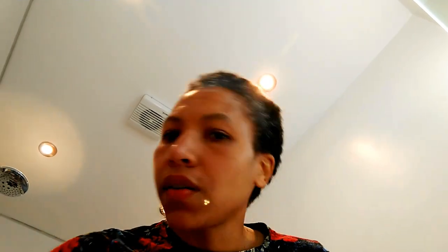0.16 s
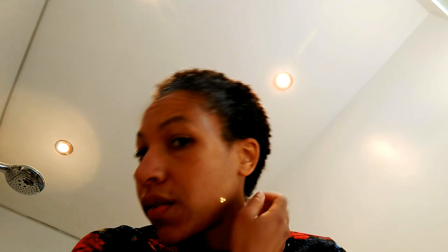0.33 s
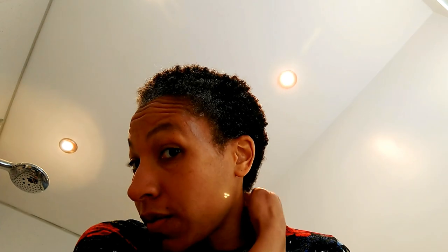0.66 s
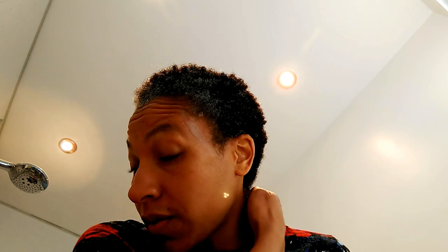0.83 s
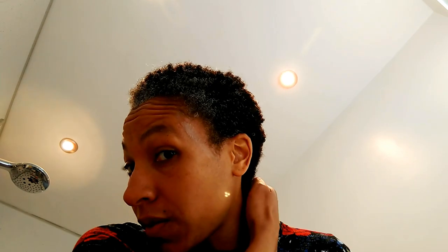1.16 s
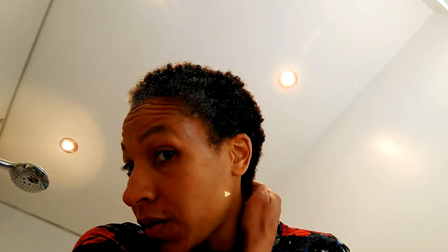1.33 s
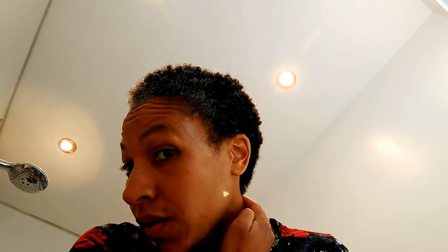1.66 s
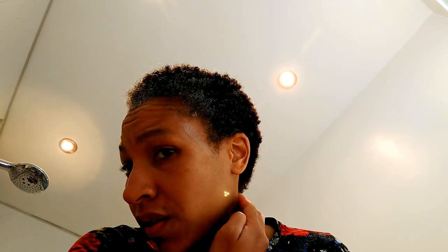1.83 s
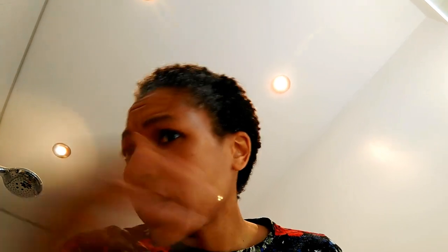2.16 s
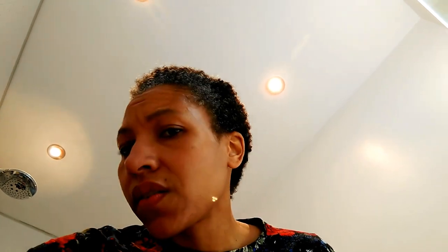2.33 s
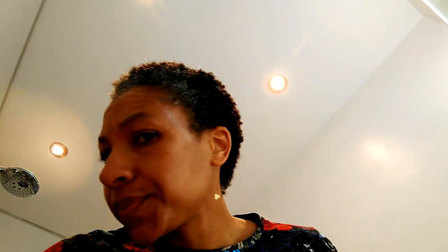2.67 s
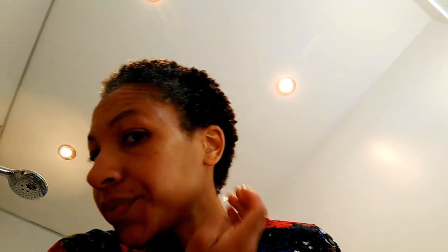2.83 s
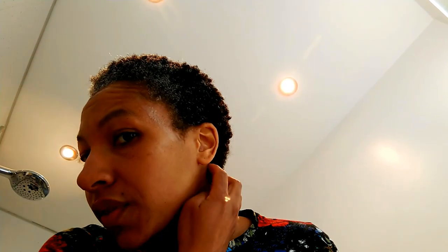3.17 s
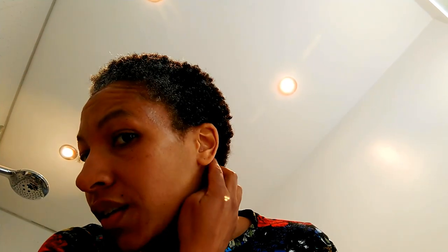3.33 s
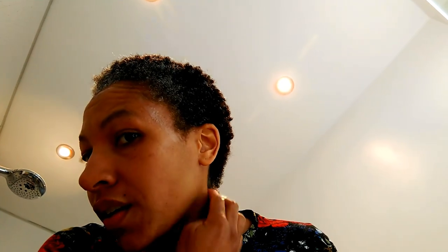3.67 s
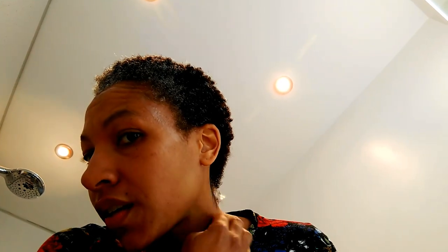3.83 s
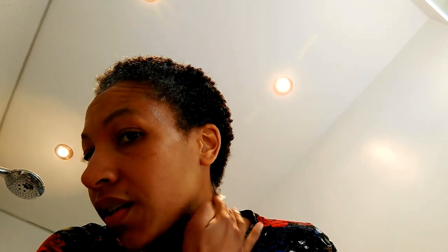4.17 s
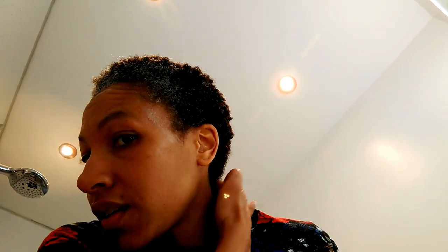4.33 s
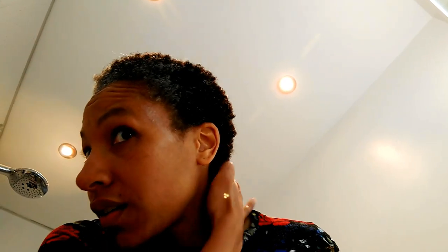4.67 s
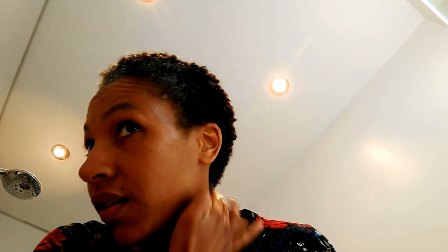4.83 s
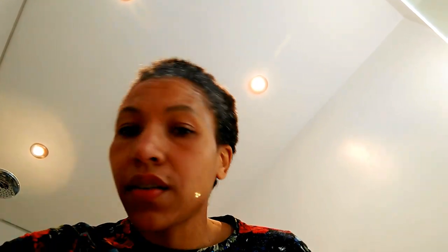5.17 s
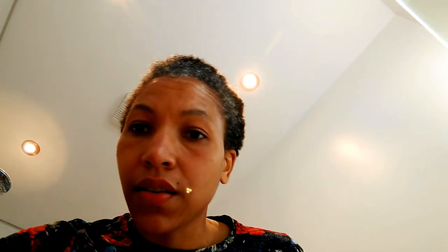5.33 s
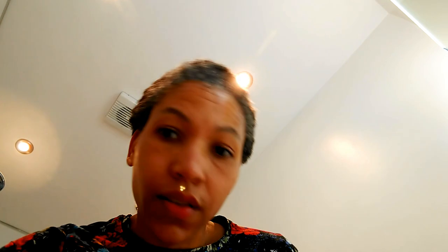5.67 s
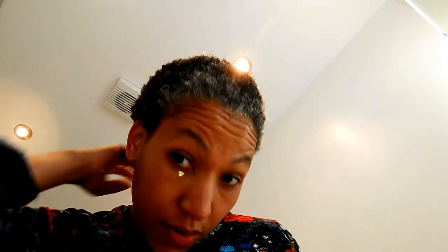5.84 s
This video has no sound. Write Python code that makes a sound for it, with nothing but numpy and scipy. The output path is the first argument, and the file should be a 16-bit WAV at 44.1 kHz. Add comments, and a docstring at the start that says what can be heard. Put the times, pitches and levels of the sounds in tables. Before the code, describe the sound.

A close handheld stereo microphone picks up a wavering, throbbing ventilation fan with soft low airflow. Right away something hard clatters in several fast bounces, far louder than the fan, with a short tiled-room echo. Small dry rubs of fingers on skin and cloth, ticks and faint bumps come next. A single knock lands mid-way, after which the hum's stereo balance shifts; rustles resume before one more sharp knock.

```python
"""An extractor fan hums throughout in a small tiled bathroom: wavering narrow-band tones over coloured air
noise, one tone throbbing with its own noise. A hard knock with bounces opens (filtered click, echoes, noise
tail, modes); then a hand rustles on skin and cloth (uneven noise bands), ticks (noise bursts) and blips
(swelling tones) sound. A second knock comes at 2.6 s; just after, the handset shifts and its two microphone
ports hear the sound differently. Rustle, ticks and blips return, with a last knock at 5.3 s."""
import sys
import numpy as np
from scipy import signal
from scipy.fft import rfft, irfft, next_fast_len
from scipy.io import wavfile
from scipy.ndimage import uniform_filter1d

SR = 44100
rng = np.random.default_rng(int(sys.argv[2]) if len(sys.argv) > 2 else 0)


def digitize_waveform(pressure):
    """Quantize a signal to 16-bit integers and store it at the path in sys.argv[1].

    Rows of a 2-D input are taken as channels; values are limited to [-1, 1].
    """
    field = np.atleast_2d(pressure).T
    bounded = np.clip(field, -1, 1)
    quanta = np.round(bounded * 32767).astype(np.int16)
    wavfile.write(sys.argv[1], SR, quanta)


N = 264820
SIZE = next_fast_len(N + SR)  # FFT length, padded
TIME = np.arange(N) / SR
HZ = np.maximum(np.arange(SIZE // 2 + 1) * SR / SIZE, 1)

# microphone ports: freq_hz, likeness (0-1), left_lead_before_rad, left_lead_after_rad
PORTS = [(60, .3, -2.6, -3.1), (150, .6, -2.6, -3.3), (330, .4, -3.9, -3.4), (450, .95, -1.95, -2.2),
         (600, .9, -1.9, -1.9), (900, .7, -.75, -.8), (1300, .92, -.2, -.1), (1900, .9, .1, .2),
         (2300, .88, 1.45, 1.5), (2800, .92, 2.45, 2.5), (3500, .85, 3.2, 3.3), (5000, .5, 6.1, 6.1),
         (9000, .4, 6, 6), (16000, .7, 6, 6)]


def from_db(db):
    """Gain of a level in dB."""
    return 10 ** (np.asarray(db) / 20)


def rms_one(x):
    """Scale to rms 1."""
    return x / np.sqrt(np.mean(np.abs(x) ** 2) + 1e-20)


def over_hz(points, axis=1):
    """Read one column of a frequency table at every bin, on a log axis."""
    table = np.array(points)
    return np.interp(np.log(HZ), np.log(table[:, 0]), table[:, axis])


def narrow(width_hz, count=N):
    """Complex noise around 0 Hz, rms 1, from a double-pole resonator."""
    pole = np.exp(-np.pi * width_hz / SR / 2)
    run_in = min(SR, count)
    white = rng.standard_normal(count + run_in) + 1j * rng.standard_normal(count + run_in)
    return rms_one(signal.lfilter([1], [1, -2 * pole, pole * pole], white)[run_in:])


def shifted():
    """Handset position: 0 before the move, 1 after."""
    shift_s = (2.75, 3.45)
    return np.interp(TIME, shift_s, [0, 1])


def at_ports(shared, apart, gain, alike):
    """A shared part leads at one port by a phase per frequency; an unrelated part enters with opposite signs."""
    weights = np.sqrt([alike + 0 * HZ, 1 - alike + 0 * HZ])
    shared, apart = rfft([shared, apart], SIZE) * gain * weights
    heard = []
    for column in (2, 3):
        turn = np.exp(.5j * over_hz(PORTS, axis=column))
        ports = [(shared + apart) * turn, (shared - apart) * turn.conj()]
        heard.append(irfft(ports, SIZE)[:, :N])
    before, after = heard
    return before + (after - before) * shifted()


def noise(spectrum, crackle_db=0):
    """Coloured noise at both ports, rms 1; uneven sample sizes make it crackle."""
    alike = (1 + np.clip(over_hz(PORTS), 0, 1)) / 2
    sizes_db = crackle_db * np.minimum(rng.exponential(1, N), 6)
    white = rng.standard_normal((2, N)) * from_db(sizes_db)
    return rms_one(at_ports(*white, from_db(over_hz(spectrum)), alike))


def tone(hz, wobble, lead_rad, pan_db):
    """A carrier with a complex wobble, split between the ports in phase and level."""
    carrier = np.sqrt(2) * wobble * np.exp(2j * np.pi * hz * TIME[:len(wobble)])
    left = carrier * np.exp(.5j * lead_rad) * from_db(pan_db / 2)
    right = carrier * np.exp(-.5j * lead_rad) * from_db(-pan_db / 2)
    return np.real([left, right])


def fan():
    """Air noise, plus blade tones and duct resonances that waver by their width, plus the throbbing tone."""
    # air noise colour: freq_hz, relative_level_db_per_hz
    air_colour = [(15, -44.5), (45, -37), (66, -21), (110, -28), (160, -10.5), (270, -5.5), (385, -3.5),
                  (430, -12.5), (680, -27.5), (1200, -36), (2000, -39), (3100, -34), (3700, -47.5),
                  (5500, -54.5), (9000, -77.5)]
    air_db = -46
    return from_db(air_db) * noise(air_colour) + fan_tones() + throbbing_tone()


def fan_tones():
    """Narrow-band tones whose level, phase and balance glide as the handset moves."""
    # tones: freq_hz, width_hz, then before the shift level_db, left_lead_rad, left_minus_right_db,
    # then the same three after it
    tones = [(154.8, 2.7, -49.5, -1.8, 4.4, -48, 3, -6), (221.4, 8.7, -53, 0.81, 12, -48, 3, -6),
             (311.2, 5.9, -52, 1.6, 0.5, -55, 3, -12.5), (359.4, 16, -63.5, 0.7, 0.54, -57, 1.5, -8.5),
             (760, 12, -76.5, -1.1, 0.96, -78.5, -1.5, 5.5), (935, 5.5, -79, -1.1, 1.5, -82, -3, 17),
             (1416, 71, -77.5, -.22, 1.5, -76, -5.5, 1.5), (1753, 60, -79.5, 0.85, 1.3, -82, -6, 1.5),
             (2271, 150, -73, 2.1, 1.5, -77, 1.5, 4.5)]
    shift_dip_db = -5  # the handset passes through a null of the room for the lowest tone
    out, move = np.zeros((2, N)), shifted()
    for hz, width_hz, db, lead_rad, pan_db, after_db, lead_after_rad, pan_after_db in tones:
        steady = np.clip(4.1 / width_hz, 0, 3)  # narrow lines are cleaner
        wobble = rms_one(steady + narrow(18.0 + width_hz))
        dip_db = shift_dip_db * np.sin(np.pi * move) * (hz < 200)
        level_db = db + (after_db - db) * move + dip_db
        lead_now_rad = lead_rad + (lead_after_rad - lead_rad) * move
        pan_now_db = pan_db + (pan_after_db - pan_db) * move
        out += from_db(level_db) * tone(hz, wobble, lead_now_rad, pan_now_db)
    return out


def throbbing_tone():
    """A tone of wandering phase swells and collapses; noise around it joins the collapses, not the peaks."""
    # throbbing noise colour: freq_hz, relative_level_db_per_hz
    skirt_colour = [(390, -45), (420, -3), (460, 11), (520, 2), (600, -4), (640, -56.5)]
    skirt_db, skirt_top_db = -2, -44  # noise relative to tone; tone level at which the noise stops rising
    slow_slips_rad = 1.94 * narrow(1.38).real
    fast_jitter_rad = 0.47 * narrow(39.85).real
    wander = np.exp(1j * (slow_slips_rad + fast_jitter_rad))
    level_db = throb_db()
    hum = from_db(level_db) * tone(466.4, wander, lead_rad=-2, pan_db=1.5)
    skirt_level_db = np.minimum(level_db, skirt_top_db) + skirt_db
    return hum + from_db(skirt_level_db) * noise(skirt_colour)


def throb_db():
    """Throb level: the tone drops out about every 0.38 s, returns, sags and flutters."""
    # dropouts: middle_s, length_s, depth_db (short ones stay shallower), level_after_db (before sag)
    dropouts = [(0.049, 0.041, 13, -40.5), (0.324, 0.13, 13.5, -37), (0.671, 0.15, 9, -36.5),
                (1.078, 0.19, 6.5, -36), (1.48, 0.13, 43, -37.5), (1.862, 0.073, 47, -38),
                (2.218, 0.097, 43, -38.5), (2.615, 0.05, 15, -38.5), (3.038, 0.15, 8.5, -36.5),
                (3.451, 0.09, 35, -40.5), (3.866, 0.095, 38, -38), (4.297, 0.11, 27.5, -36.5),
                (4.619, 0.13, 34.5, -34.5), (4.9, 0.09, 11.5, -35), (5.246, 0.18, 9, -38),
                (5.584, 0.089, 39, -38.5), (5.921, 0.07, 31, -40.5)]
    start_db, sag_db_per_s = -30, 8.5
    fall_s, return_s = 0.083, .025
    flutter_rms_db, flutter_hz = 3, 90
    middle_s, length_s, depth_db, after_db = np.transpose(dropouts)
    last = np.searchsorted(middle_s, TIME)
    since_s = TIME - np.r_[0, middle_s][last]
    level_db = np.r_[start_db, after_db][last] - sag_db_per_s * since_s
    level_db = uniform_filter1d(level_db, size=1500)
    for middle, length, depth in zip(middle_s, length_s, depth_db):
        falling = (TIME - middle + length / 2) / fall_s
        returning = (middle + length / 2 - TIME) / return_s
        level_db -= depth * np.clip(np.minimum(falling, returning) + .5, 0, 1) ** 2
    return level_db + flutter_rms_db * np.sqrt(2) * narrow(flutter_hz).real


def knocks():
    """Each blow is a click with first echoes and a tiled-room tail, coloured by the object, plus modes."""
    # knocks, the first with bounces: start_s, direct_peak_db, room_db, thump_db, hollow_db, snap_db
    blows = [(0.1005, -0.5, -21, -4, 2.4, -2), (0.1125, -4.5, -17, -0.5, -1.5, 3.5),
             (0.1235, -3.5, -25, 0, 2, -10), (0.136, -11, -23.5, -3.5, -7, 0),
             (0.1465, -5.5, -32, -4.5, 1, 2), (0.1518, -12, -27, -2, 4.5, -3),
             (2.6285, 0, -24.5, 4, 0.5, -1), (5.3012, 0.46, -24.5, 1.5, -10, 6)]
    # object colour: freq_hz, relative_level_db_per_hz
    object_colour = [(24, -49), (97, -36.5), (200, -11.5), (300, -22.5), (560, -12), (780, -6.5),
                     (1040, -18), (1390, -8), (2050, -24), (2400, -15), (3300, -35), (4000, -38.5),
                     (6000, -59.5), (10000, -70.5), (16000, -76.5)]
    part_centres_hz = (220.2, 755.5, 2550)  # thump, hollow, snap
    ring_db = -23.5
    out = np.zeros((2, N))
    alike = (1 + .95 * np.clip(over_hz(PORTS), 0, 1)) / 2
    for start_s, db, room_db, *parts_db in blows:
        def struck_db(hz):
            """How this blow favours the parts of the object."""
            return sum(part_db * np.exp(-(np.log2(hz / centre_hz) / 0.46) ** 2)
                       for part_db, centre_hz in zip(parts_db, part_centres_hz))
        at = round(start_s * SR)
        colour = causal(from_db(over_hz(object_colour) + struck_db(HZ)))
        clicks = click_and_echoes(at)
        direct = at_ports(clicks, clicks, colour, 0.97)
        blow = direct + from_db(room_db) * at_ports(*room_tail(at), colour, alike)
        modes = ringing(at, struck_db)
        rung = at_ports(modes, modes, 1, 0.97)
        out += from_db(db) * (blow / np.abs(direct).max() + from_db(ring_db) * rung)
    return out * from_db([[.3], [-.3]])


def causal(gain):
    """Minimum-phase filter of a magnitude, so that nothing sounds before a hit."""
    cepstrum = irfft(np.log(gain + 1e-9), SIZE)
    cepstrum[1:SIZE // 2] *= 2
    cepstrum[SIZE // 2 + 1:] = 0
    return np.exp(rfft(cepstrum))


def click_and_echoes(at):
    """A unit click and first reflections of random sign, slightly jittered; later ones are duller."""
    # first reflections: delay_s (before jitter), level_db
    echoes = [(.0008, -8.5), (.0016, -0.5), (.0027, -3.5), (.0083, -3), (0.0115, -8.5), (.018, -15)]
    clicks = np.zeros(N)
    clicks[at] = 1
    for (delay_s, echo_db), (jitter, sign) in zip(echoes, rng.uniform(-0.92, 1, (len(echoes), 2))):
        smear = np.hanning(3 + round(.03 * delay_s * SR))
        start = at + round(delay_s * (1 + 0.052 * jitter) * SR)
        clicks[start:start + len(smear)] += from_db(echo_db) * np.sign(sign) * smear / smear.sum()
    return clicks


def room_tail(at):
    """Dense reflections: noise that builds up, then decays at its own rate in each band."""
    # room decay: freq_hz, t60_s
    room_t60 = [(100, 0.53), (500, .19), (1400, .16), (2600, 0.15), (4500, .19), (7000, .09),
                (12000, 0.05015)]
    hz, t60_s = np.transpose(room_t60)
    t = np.arange(SR // 2) / SR
    spectra = rfft(rng.standard_normal((2, len(t))))
    bins_hz = np.fft.rfftfreq(len(t), 1 / SR)
    edges_hz = np.geomspace(20, 20000, 19)
    decaying = np.zeros((2, len(t)))
    for low, high in zip(edges_hz, edges_hz[1:]):
        band = irfft(spectra * ((bins_hz >= low) & (bins_hz < high)), len(t))
        band_t60_s = np.interp(np.log(np.sqrt(low * high)), np.log(hz), t60_s)
        decaying += band * from_db(-60 * t / band_t60_s)
    tail = np.zeros((2, N + SR))
    tail[:, at:at + len(t)] = (1 - np.exp(-t / .006)) * decaying
    return tail[:, :N]


def ringing(at, struck_db):
    """Decaying sine modes of room and object, as strong as the blow favours them."""
    # modes: freq_hz, level_db (before the blow's own weighting), t60_s (before the cap)
    modes = [(228, -24.5, 0.87), (349, -5.5, 0.33), (349.4, 6.5, 0.15), (458.2, -37, 5.0), (753, 14, 0.13),
             (888, -16.5, 0.083), (1045, -0.5, 0.48), (1210, 9.5, 0.074), (1370, -12, 0.067),
             (1758, -16.5, 0.41), (2213, -31, 0.72), (2480, -13.5, 0.9)]
    t60_cap_s = .17
    t = np.arange(SR // 2) / SR
    rung = np.zeros(N + SR)
    for (hz, db, t60_s), phase in zip(modes, rng.uniform(0, 2 * np.pi, len(modes))):
        decay_db = db + struck_db(hz) - 60 * t / min(t60_s, t60_cap_s)
        onset = 1 - np.exp(-t / 0.0024)
        rung[at:at + len(t)] += from_db(decay_db) * np.sin(2 * np.pi * hz * t + phase) * onset
    return rung[:N]


def hand():
    """Crackly rustle in two bright bands over a duller rub; each stroke on skin and cloth rises, holds, fades."""
    # strokes: full_strength_s, hold_s, high_rustle_db, middle_rustle_db, low_rub_db
    strokes = [(0.566, 0.039, -66, -69.5, -47), (1.4, 0.011, -84, -71, -76), (1.453, 0.068, -76, -76, -63),
               (1.596, .02, -76, -97, -85), (1.69, .025, -86, -95, -78), (1.772, 0.049, -69.5, -87, -80),
               (1.87, 0.025, -73, -90, -80), (1.94, .025, -77, -92, -77), (2.062, .025, -81.5, -90, -69),
               (3.592, .006, -73, -86, -62.5), (4.018, .01, -84, -90, -83.5),
               (4.333, 0.041, -59.5, -68.5, -44), (4.415, 0.025, -63.5, -75, -70),
               (4.6, 0.05, -76.5, -85, -86)]
    # high rustle colour: freq_hz, relative_level_db_per_hz
    high_colour = [(9500, -36), (10800, -4), (11500, 0), (12100, 1.5), (13300, -4.5), (15000, 0),
                   (16000, -19)]
    # middle rustle colour: freq_hz, relative_level_db_per_hz
    middle_colour = [(4500, -29), (5800, -29), (7300, -24), (8500, 3), (9200, -2), (9900, -12),
                     (10600, -30)]
    # low rub colour: freq_hz, relative_level_db_per_hz
    rub_colour = [(700, -14), (1000, -12.5), (1500, -10.5), (2000, -17), (2600, 10), (3200, -20),
                  (3500, -16), (3750, -13.5), (4050, -9.5), (4700, -32), (5800, -26.5), (6600, -53)]
    lead_in_db_per_s = 1400
    releases_db_per_s = (260, 260.5, 600)  # high, middle, low: the rub stops soonest
    grain_db, grain_hz = 3.5, 200  # uneven catching of the skin; rms of the complex noise
    levels = np.zeros((3, N))
    for full_s, hold_s, *bands_db in strokes:
        rise_db = lead_in_db_per_s * np.maximum(full_s - TIME, 0)
        fade_db = np.outer(releases_db_per_s, np.maximum(TIME - full_s - hold_s, 0))
        levels += from_db(np.c_[bands_db] - np.minimum(rise_db + fade_db, 200))
    out = np.zeros((2, N))
    for level, colour in zip(levels, (high_colour, middle_colour, rub_colour)):
        grain = rms_one(from_db(grain_db * narrow(grain_hz).real))
        out += level * grain * noise(colour, crackle_db=3)
    return out


def ticks():
    """Small bright ticks: bursts of coloured noise that start at once and die fast."""
    # ticks: start_s, start_level_db, t60_s
    tick_table = [(0.5621, -75, 0.09), (0.5896, -50.5, 0.09), (1.4117, -76, 0.09), (1.4621, -54.5, 0.09),
                  (3.6052, -66, 0.09), (4.3899, -62, 0.09), (4.4258, -77, 0.09), (4.9853, -53.5, 0.14),
                  (5.573, -53, 0.09)]
    # tick colour: freq_hz, relative_level_db_per_hz
    tick_colour = [(4300, -26), (5300, -9), (6200, -23), (7100, -23.5), (8500, -9.5), (9600, -31),
                   (11500, -7.5), (13000, -25), (15300, -19), (16000, -7.5)]
    envelope = np.zeros(N)
    for start_s, db, t60_s in tick_table:
        decay_db = db - 60 * np.maximum(TIME - start_s, 0) / t60_s
        envelope += from_db(decay_db) * (TIME >= start_s)
    return envelope * noise(tick_colour)


def blips():
    """Faint short resonances: narrow-band noise on a carrier under a bell-shaped swell."""
    # blips: middle_s, level_db, freq_hz, width_hz, length_s (three standard deviations of the swell)
    blip_table = [(1.211, -55.5, 1810, 120, 0.017), (1.218, -68, 2210, 119, 0.061),
                  (1.741, -63, 2180, 59.7, 0.028), (1.718, -62, 844, 120, 0.035),
                  (2.327, -67, 2180, 150, 0.03), (2.399, -54.5, 1377, 300, 0.023),
                  (4.07, -60, 1420, 119, 0.048), (4.223, -61.5, 1386, 120, 0.045),
                  (4.365, -51, 1080, 1300, 0.042), (1.548, -62, 2780, 300, 0.015),
                  (4.668, -61, 790, 400, 0.032), (4.812, -67, 1430, 80, 0.049),
                  (5.001, -64, 5320, 200, 0.032), (5.239, -47, 842, 700, 0.028),
                  (5.61, -58, 770, 500, 0.037), (5.679, -67, 1710, 98.5, 0.035),
                  (5.852, -78, 11100, 600, 0.14), (5.897, -62.5, 1950, 400, 0.18)]
    out, half = np.zeros((2, N + SR)), SR // 4
    for middle_s, db, hz, width_hz, length_s in blip_table:
        swell = np.exp(-.5 * ((TIME[:2 * half] - half / SR) * 3 / length_s) ** 2)
        at = round(middle_s * SR) - half
        blip = tone(hz, narrow(width_hz, count=2 * half), lead_rad=-.3, pan_db=1.5)
        out[:, at:at + 2 * half] += from_db(db) * swell * blip
    return out[:, :N]


def scene():
    """Fan, knocks, hand, ticks and blips together."""
    return fan() + knocks() + hand() + ticks() + blips()


def record(dry):
    """The microphone adds hiss, the highest peaks are rounded, the top is cut."""
    hiss_db, cutoff_hz = -76.5, 15750
    hissy = dry + from_db(hiss_db) * rng.standard_normal(dry.shape)
    rounded = hissy / (1 + np.abs(hissy) ** 16) ** (1 / 16)
    low_pass = signal.ellip(10, .5, 70, cutoff_hz, fs=SR, output="sos")
    return signal.sosfilt(low_pass, rounded)


dry = scene()
out = record(dry)
digitize_waveform(out)
```